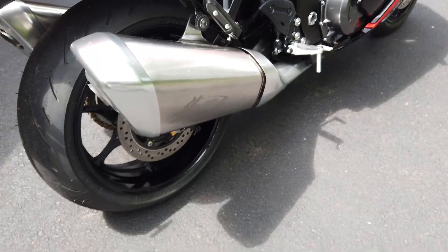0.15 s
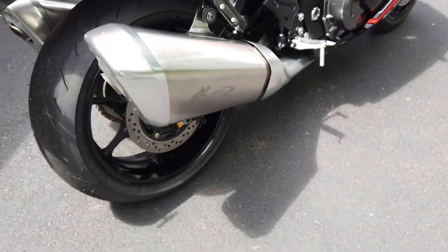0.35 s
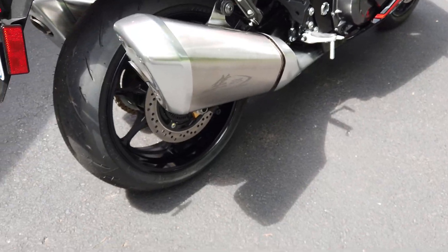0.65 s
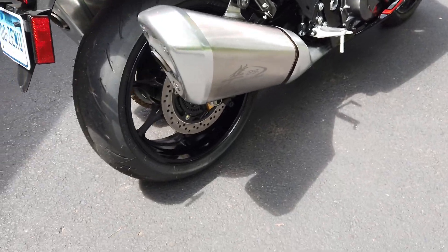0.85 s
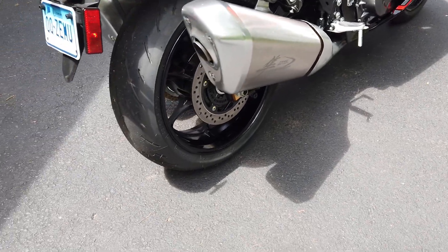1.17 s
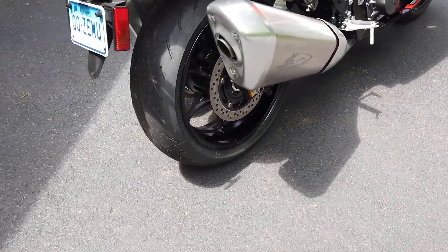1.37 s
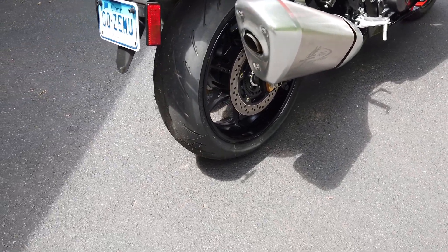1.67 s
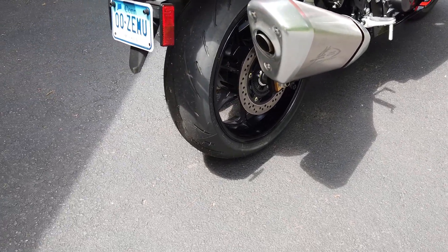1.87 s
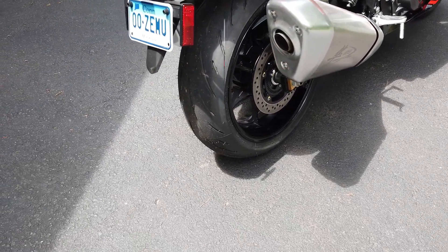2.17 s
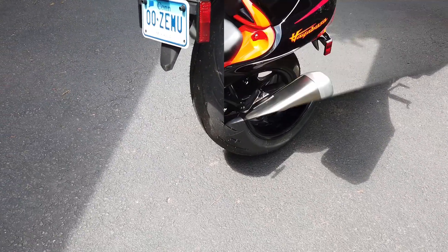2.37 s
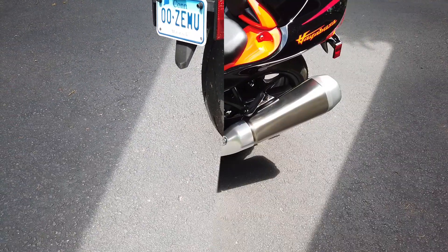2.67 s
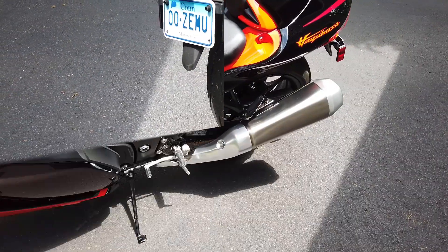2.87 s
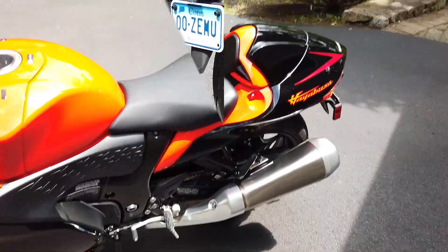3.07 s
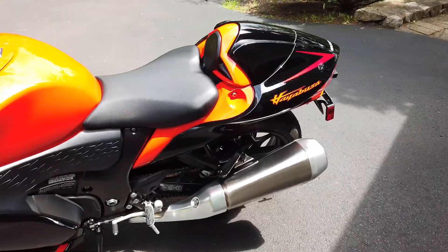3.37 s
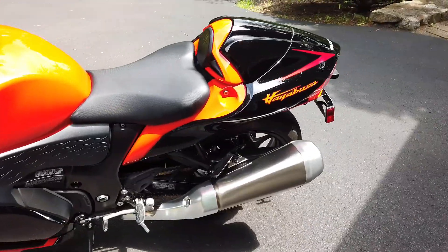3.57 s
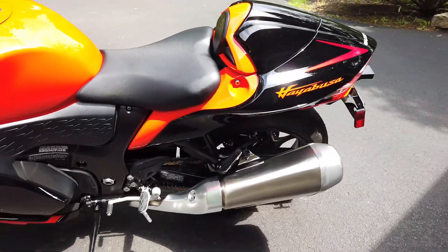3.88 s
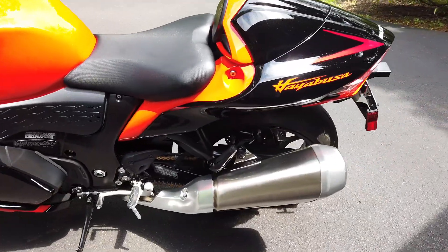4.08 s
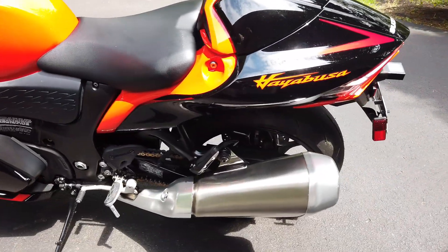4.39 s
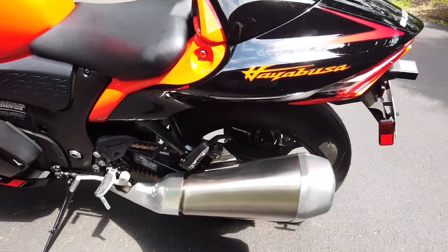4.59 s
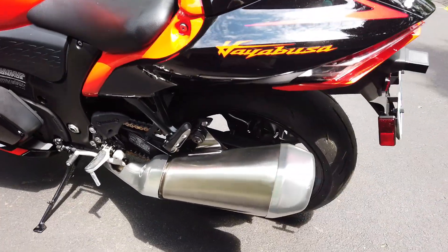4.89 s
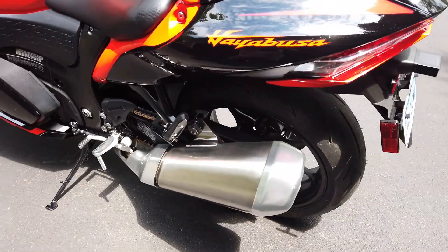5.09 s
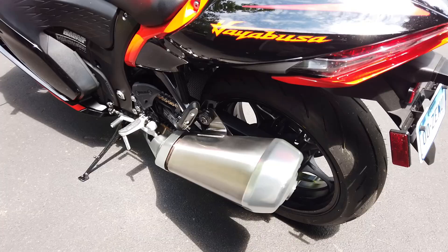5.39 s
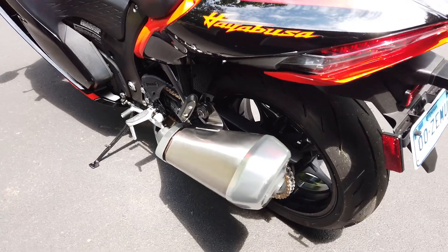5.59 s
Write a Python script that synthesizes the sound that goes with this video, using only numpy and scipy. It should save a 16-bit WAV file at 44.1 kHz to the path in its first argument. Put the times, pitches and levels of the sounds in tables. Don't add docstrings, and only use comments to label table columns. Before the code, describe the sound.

A four-cylinder motorcycle is already idling at the start, outdoors on asphalt, heard in close handheld stereo. From 0 to about 2.7 seconds the microphone is near the silencer: a deep, dense booming drone of rapid exhaust pulses, about 55 per second, creeping slightly higher, with rough gas flutter and a buzzing upper edge. Quiet mechanical ticks, faint metallic rings and airy hiss lie beneath. Small speed wavers come and go, the broadest near 1.1 seconds; around 1.5 the tone shifts as the pipe end is passed. At 2.7 seconds it cuts instantly, without a fade, to the engine's side. The idle is slightly lower, the bass much weaker, and valve clatter, gear chatter and ringing covers stand out, spread wide. Walking back, the exhaust swells steadily and clatter changes colour, passing the silencer tip around 4.6. Slight surges near 4.1 and 4.7; the idle continues to the end, around 5.7.

```python
import sys
import numpy as np
from scipy import signal
from scipy.fft import rfft, irfft
from scipy.io import wavfile

SR = 44100
rng = np.random.default_rng(int(sys.argv[2]) if len(sys.argv) > 2 else 0)


def log_audio(samples):
    frames = np.atleast_2d(samples).T
    limited = np.clip(frames, -1, 1)
    pcm = np.round(limited * 32767).astype(np.int16)
    wavfile.write(sys.argv[1], SR, pcm)


def nominal_scale(level):
    x = np.asarray(level, float) / 20
    return 10 ** x


N = 253134
TIME = np.arange(N) / SR
CUT_S = 2.7153
HUNT_HZ = 0.3
RING_WIDTH_HZ, RING_LOSS_HZ = 50, 4500
RING_SIDE_DB = 2.5

# firing rate at start in Hz, drift in Hz per second.
IDLE = [
    (55.0, .55),
    (51.48, .03),
]
# peak in seconds, rise in Hz, half length in seconds.
SURGES = [
    [(.43, 1.1, .07), (.79, .8, .04), (1.11, 2.3, .17), (1.58, 1.6, .06), (1.69, -1.3, .04),
     (1.89, 1.6, .07), (2.23, 2.0, .045)],
    [(2.84, -1.2, .07), (3.05, 2.2, .1), (3.27, 2.2, .09), (3.66, .8, .14), (4.12, 3.0, .11),
     (4.74, 3.3, .13), (5.16, 2.2, .1), (5.6, 1.3, .06)],
]
# start in seconds, passing the silencer tip in seconds, step length in seconds.
WALK = [
    (0, 1.45, 0.17),
    (2.72, 4.61, .08),
]
CLOSING = (0.84, 1.44)
# turns from a pressure trough to the scene change,
# lag of the higher orders in radians, flutter under the upper orders in dB.
PULSE = [
    (.165, .7, -9),
    (-.38, -.7, -3),
]
# level at start in dB,
# dB per second of walk, dB past the tip, dB per Hz of speed.
PIPE_LAW = [
    [(-7, -0.17, -1, 0.2), (-26, 0.5, 2.5, -0.04), (-31, 2, 1, -2), (-54, 2.5, 4.5, 1),
     (-29.5, 0, -2, 1.45)],
    [(-23.5, 1.93, -0.26, -0.23), (-32.5, 1.5, 3.5, 0.24), (-29, 0.95, -7.5, -0.5), (-49.5, -0.06, 7, 2),
     (-43, -0.05, 1, 0.6)],
]
# multiple of the firing rate, level in dB.
UPPER = [
    [(5, 0), (6, -7.5), (7, -1), (8, -8), (9, -27)],
    [(5, -3.5), (6, -2), (7, -3), (8, -7.5), (9, -7)],
]
# frequency in Hz, level in dB per Hz.
FLUTTER = [
    [(20, -38), (40, -34), (90, 5), (200, -15), (330, 5.5), (450, 7), (600, -10.5)],
    [(20, 1.5), (40, -17), (90, -31), (200, -4.5), (330, -6.5), (450, -17), (600, -11)],
]
BODY_EDGES_HZ = [480, 1150, 2260, 4300, 6900, 9600, 12600, 15900]
DRIVE = [
    (.15, .15),
    (.45, .2),
    (.15, .06),
    (.08, .08),
    (.12, .15),
    (.18, .24),
    (.15, .15),
]
# level at start in dB,
# dB per second of walk, dB past the tip.
BODY_LAW = [
    [(-39, -1.56, 0.7), (-42.5, -1, 0), (-47, -0.4, 0.5), (-52, -.3, -0.5), (-50.5, -1, -4),
     (-48.5, -1, -0.5), (-52.5, -2, 1.5)],
    [(-47.5, 1.5, 2), (-40, 1.73, -3.5), (-48.5, -0.27, -0.2), (-51.5, -3, 0.3), (-53, -2, -1),
     (-52.5, -0.94, -0.4), (-54.5, -1.8, -1)],
]
# frequency in Hz, level in dB per Hz.
COLOUR = [
    [(240, -27), (400, -24), (425, -2.5), (452, -19), (606, -26.5), (960, -23), (1150, -28), (1640, -25),
     (1950, -32.5), (2230, -32), (2450, -30.5), (4390, -39.5), (9180, -37.5), (11200, -30), (15700, -37)],
    [(240, -33), (400, 19.5), (452, -12.5), (664, -10), (717, -7.5), (836, -9.5), (1370, -6.5),
     (1480, -5.5), (1890, -1.5), (2570, -20.5), (3380, -16.5), (4260, -22.5), (7880, -31.5), (11600, -26),
     (15700, -35)],
]
# frequency in Hz, # clearest moment in seconds, half span in
# seconds, level in dB.
CRANKCASE = [
    [(765, 1.3, 0.34, -46), (1040, .11, .3, -46.5), (1487, 0.46, 0.77, -48.5), (1661, 2.56, 1, -50)],
    [(328, 3.68, 0.42, -41), (749, 2.89, 0.25, -44.5), (1092, 5.03, 0.21, -44.5), (1321, 4.42, .14, -40.5),
     (1354, 5.27, .35, -39), (1378, 4.08, 0.51, -41.5), (1600, 2.95, 0.45, -47), (1587, 5.5, 0.21, -44),
     (1620, 4.7, 0.35, -40), (1853, 3.88, 0.36, -41), (1860, 5.23, 0.23, -46), (1955, 3.27, 0.37, -47),
     (2025, 3.28, 0.79, -42), (2060, 4.87, 0.11, -40.5)],
]
# frequency in Hz,
# clearest moment in seconds, half span in seconds, level in dB.
HEAD = [
    [(2408, 0.22, 0.45, -47.5), (2476, 1.2, 0.085, -49.5), (2434, 1.64, .5, -55.5),
     (2645, 2.15, .47, -53.5), (2840, .1, 0.29, -47), (2880, 0.82, 0.19, -53), (6730, .34, 0.56, -60),
     (10950, 1.45, .49, -56.5), (11230, 0.37, .67, -53)],
    [(2184, 3.33, .46, -48), (2310, 4.91, 0.18, -48.5), (2720, 4.96, 0.28, -53.5), (2730, 3.6, 0.79, -59.5),
     (2710, 4.36, 0.086, -51.5), (3470, 4.68, 0.081, -49.5), (2710, 5.65, 0.13, -54.5),
     (3730, 4.33, .06, -51.5), (3850, 4.58, 0.3, -56), (10300, 4.18, 0.15, -53.5), (10550, 5.65, 0.1, -62),
     (11560, 3.93, 0.23, -51.5)],
]
# frequency in Hz, side minus mid in dB.
PORTS = [
    [(60, -30), (110, -70), (200, -18), (380, -21.5), (700, -31), (1290, -21), (1900, -14), (2400, -8.5),
     (2900, -6.5), (4400, -6), (8120, -4.5), (15000, -0.5)],
    [(60, -24), (110, -27), (200, -20.5), (380, -18.5), (700, -17.5), (1290, -16), (1800, -17), (2250, 1.5),
     (2750, 4), (3200, -11), (4400, -4.5), (8120, -3.5), (15000, -4)],
]


def level(x, db=0):
    return x * nominal_scale(db) / np.sqrt(np.mean(x ** 2))


def colour(x, points, size=4096):
    f = np.maximum(np.arange(size // 2 + 1) * SR / size, 1)
    hz, db = np.transpose(points)
    gain = nominal_scale(np.interp(np.log(f), np.log(hz), db))
    cepstrum = irfft(np.log(gain))
    cepstrum[1:size // 2] *= 2
    cepstrum[size // 2 + 1:] = 0
    return signal.oaconvolve(x, irfft(np.exp(rfft(cepstrum))))[:N]


def band(x, lo, hi, order=3):
    sos = signal.butter(order, [lo, hi], "band", fs=SR, output="sos")
    return level(signal.sosfilt(sos, x))


def per_firing(turns, rate=1):
    steps = (turns - turns[0]) * rate
    return np.interp(steps, np.arange(N // 100), rng.standard_normal(N // 100))


def surge(view):
    bells = sum(hz * np.exp(-0.5 * ((TIME - at) / span) ** 2) for at, hz, span in SURGES[view])
    return bells + HUNT_HZ * per_firing(TIME, 12)


def crank(hz, at_cut):
    steady = np.cumsum(hz) / SR
    turns = steady + 0.012 * per_firing(steady)
    return turns - turns[int(CUT_S * SR)] + at_cut


def laws(table, walk, faster=0, power=1):
    start, tip, step = walk
    past = 0.5 + 0.5 * np.tanh((TIME - tip) / step)
    walked = np.maximum(TIME - start, 0) ** power
    return [db + drift_db * walked + tip_db * past + sum(speed_db) * faster
            for db, drift_db, tip_db, *speed_db in table]


def exhaust_boom(turns, low_db, lag):
    angle = 2 * np.pi * turns
    strength = per_firing(turns)
    boom = 0
    for order, (db, scatter_db) in enumerate(zip(low_db, (0.4, 0.8, 1.2, 1.5)), start=1):
        size = nominal_scale(db + 0.12 * strength + scatter_db * per_firing(turns))
        phase = order * angle - lag * (order > 1) + np.pi * (order == 4)
        boom = boom - np.sqrt(2) * size * np.cos(phase)
    return boom


def uneven_firing(turns, low_db):
    angle = 2 * np.pi * turns
    higher = np.cos(2.5 * angle + per_firing(turns, 0.25))
    lower = np.cos(1.5 * angle + per_firing(turns, 0.25))
    return nominal_scale(low_db[2] - 14) * (higher + 0.6 * lower)


def upper_orders(turns, orders, lag):
    angle = 2 * np.pi * turns
    upper = 0
    for k, db in orders:
        size = nominal_scale(db + 1.5 * per_firing(turns))
        spread = (0.5 - lag / 2) * (k - 6) ** 2
        upper = upper - size * np.cos(k * angle - lag + spread + 0.35 * per_firing(turns))
    return upper * (1 + 0.033 * np.cos(angle / 2))


def exhaust(turns, low_db, upper_db, orders, flutter, lag, flutter_db):
    boom = exhaust_boom(turns, low_db, lag) + uneven_firing(turns, low_db)
    upper = level(upper_orders(turns, orders, lag), -0.92)
    gas = colour(rng.standard_normal(N), flutter + [(1500, -70)])
    return boom + nominal_scale(upper_db) * (upper + level(gas, flutter_db))


def valve_ticks(turns, count=56):
    cycles = np.arange(np.floor(turns[0] / 4), turns[-1] / 4)[:, None]
    where, usual = rng.random(count), rng.exponential(1, count)
    chance = rng.standard_normal((len(cycles), count, 2))
    strike = 4 * (cycles + where) + 0.004 * chance[..., 0]
    at = np.interp(strike, turns, np.arange(N), left=N, right=N)
    force = nominal_scale(1.8 * usual + 2.3 * chance[..., 1]) * rng.choice([-1, 1], count)
    return np.bincount(at.astype(int).ravel(), force.ravel(), N + 1)[:N]


def shake(turns, share, puff):
    ticks = level(valve_ticks(turns))
    gate = 1 + puff * np.cos(2 * np.pi * turns - 1.0)
    return share * ticks + (1 - share) * gate * rng.standard_normal(N)


def body(turns, band_db, points):
    out = 0
    for lo, hi, db, (share, puff) in zip(BODY_EDGES_HZ, BODY_EDGES_HZ[1:], band_db, DRIVE):
        part = band(colour(shake(turns, share, puff), points), lo, hi, order=6)
        out = out + part * nominal_scale(db + 1.28 * per_firing(turns, 0.5))
    return out


def ringing_covers(turns, table, ports):
    mid, side = 0, 0
    drive = shake(turns, *DRIVE[1])
    for hz, at, span, db in table:
        width = RING_WIDTH_HZ * (1 + (hz / RING_LOSS_HZ) ** 2)
        side_db = RING_SIDE_DB + np.interp(hz, *np.transpose(ports))
        pole = np.exp((2j * hz - 1.33 * width) * np.pi / SR)
        ring = signal.lfilter([1], [1, -2 * pole, pole ** 2], drive)
        facing = np.exp(-0.5 * ((TIME - at) / span) ** 2)
        ring = ring * nominal_scale(db) / np.std(ring.real) * facing
        mid = mid + ring.real
        side = side + nominal_scale(side_db) * ring.imag
    return mid, side


def standpoint(view):
    faster = surge(view)
    start_hz, drift_hz = IDLE[view]
    hz = start_hz + drift_hz * (TIME - WALK[view][0]) + faster
    at_cut, lag, flutter_db = PULSE[view]
    turns = crank(hz, at_cut)
    *low_db, upper_db = laws(PIPE_LAW[view], WALK[view], faster, CLOSING[view])
    pipe = exhaust(turns, low_db, upper_db, UPPER[view], FLUTTER[view], lag, flutter_db)
    band_db = laws(BODY_LAW[view], WALK[view])
    near = body(turns, band_db, COLOUR[view])
    scattered = body(turns, band_db, COLOUR[view])
    rings, rings_side = ringing_covers(turns, CRANKCASE[view] + HEAD[view], PORTS[view])
    mid = pipe + near + rings
    sway = np.minimum(TIME / 0.028, 1) * per_firing(turns, 0.2)
    late = np.roll(0.39 * near + pipe * sway, 85)
    side = colour(1.07 * scattered + late, PORTS[view]) + rings_side
    return np.array([mid + side, mid - side])


def scene():
    return np.where(TIME < CUT_S, standpoint(0), standpoint(1))


def low_pass(x):
    return signal.sosfilt(signal.butter(12, 15870, fs=SR, output="sos"), x)


def record(dry):
    return low_pass(dry)


dry = scene()
out = record(dry)
log_audio(out)
```